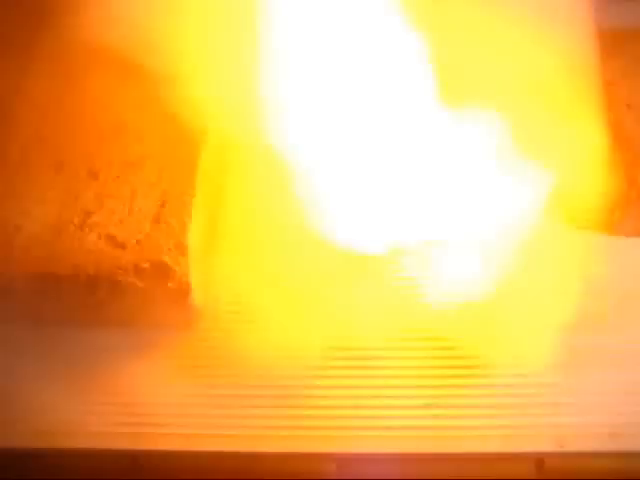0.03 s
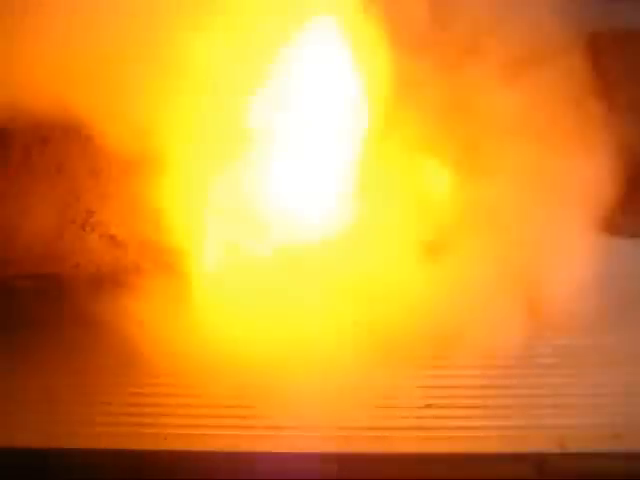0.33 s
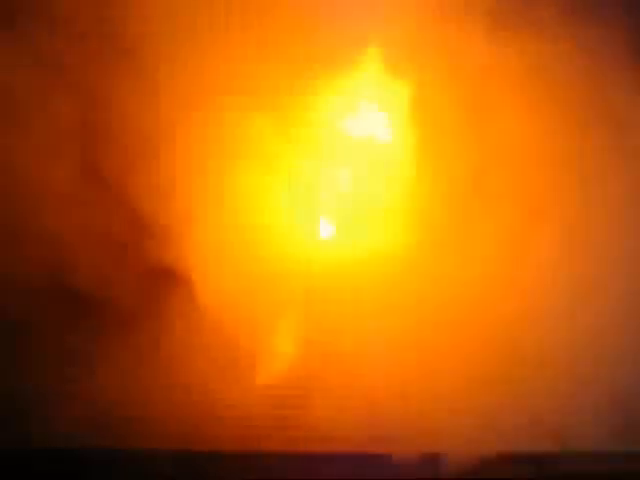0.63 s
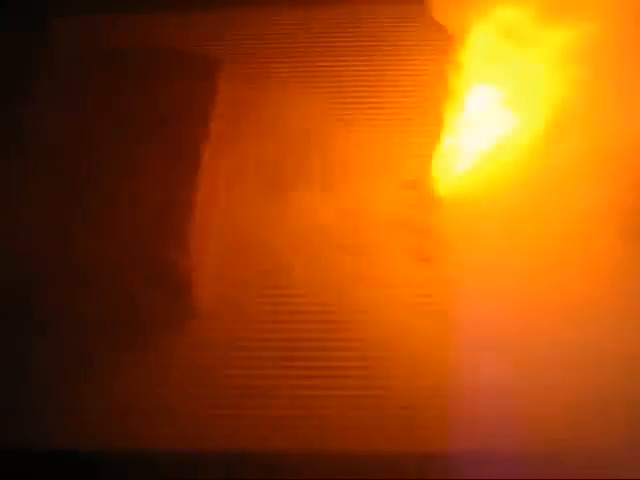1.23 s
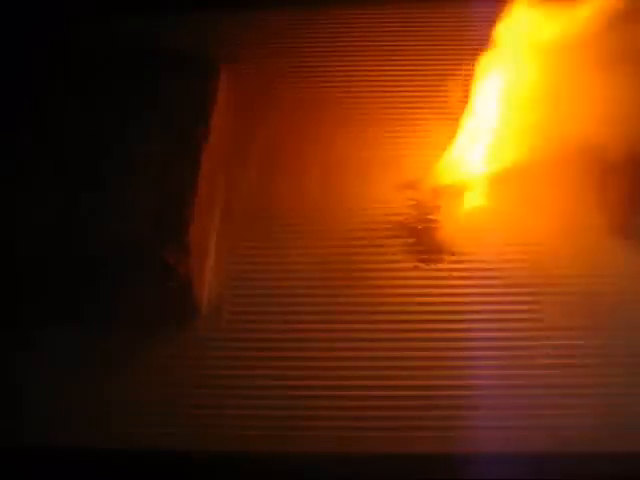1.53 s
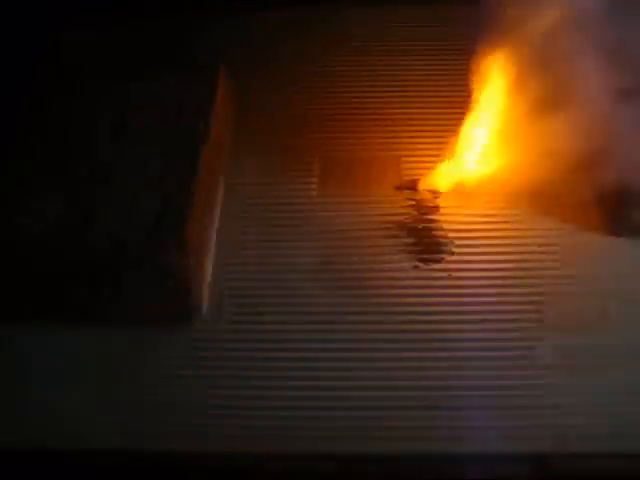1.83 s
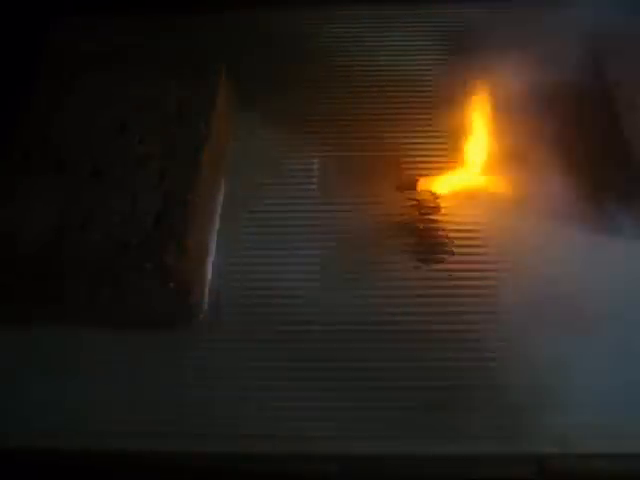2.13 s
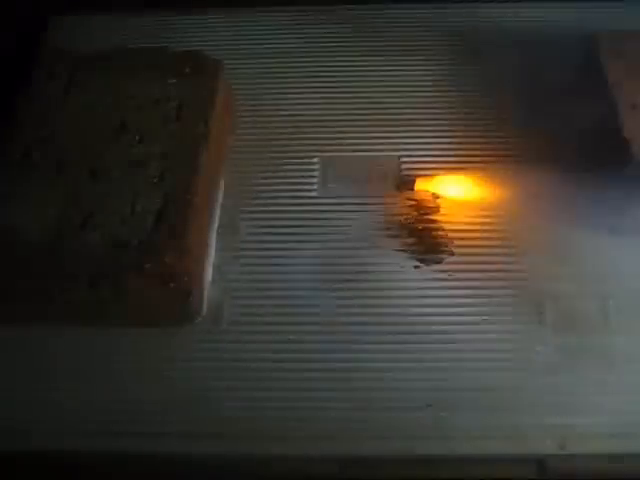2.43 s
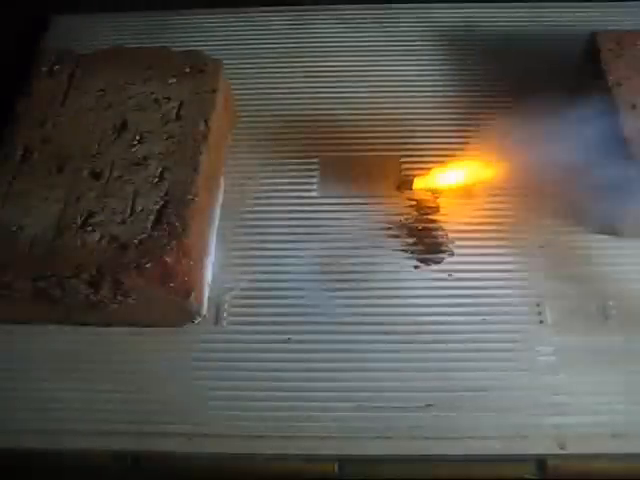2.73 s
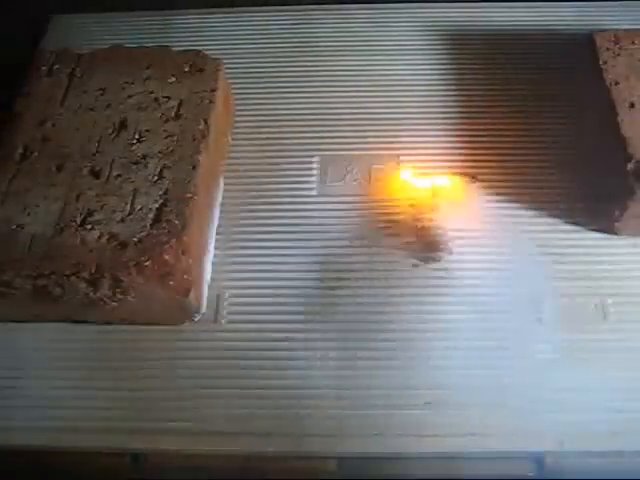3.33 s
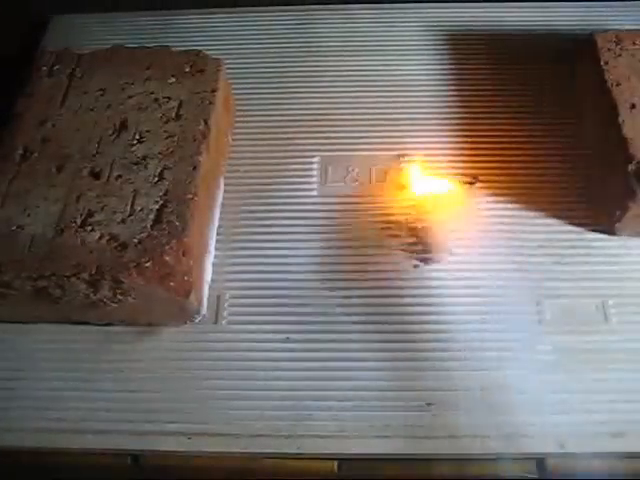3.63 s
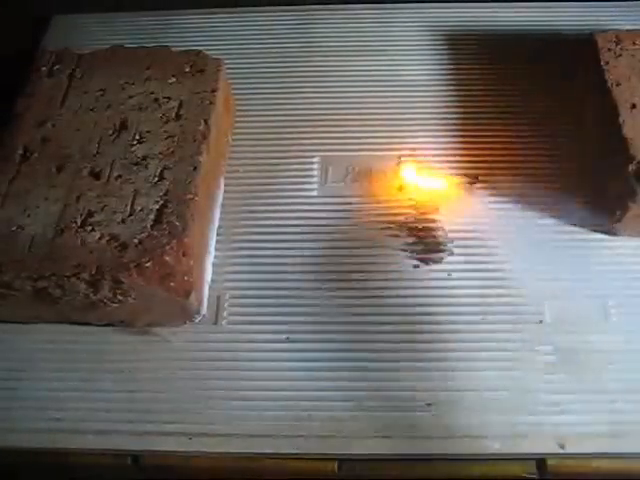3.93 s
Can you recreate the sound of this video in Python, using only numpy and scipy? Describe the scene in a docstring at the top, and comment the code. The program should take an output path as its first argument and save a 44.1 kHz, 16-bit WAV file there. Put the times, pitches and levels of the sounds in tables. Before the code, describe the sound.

Burning propellant hisses loudly and unevenly over a low roar and fine crackle. Two sharp pops break in, then the hiss steadies into a jet. Near the end, gusts rumble on the close outdoor microphone.

```python
"""An uneven, flaring hiss over a low roar: solid propellant burns outdoors on a ribbed plate, close
to a mono microphone. Turbulent gas makes the noise, and bursting grains add a fine crackle. Twice the
flow chokes and trapped gas escapes in a pop that overloads the recorder. The flare then narrows into
a steady hissing jet. Towards the end the plume turns and its gusts buffet the microphone."""
import sys
import numpy as np
from scipy import signal
from scipy.fft import rfft, irfft, next_fast_len
from scipy.io import wavfile
from scipy.ndimage import uniform_filter1d, map_coordinates

SR = 44100
rng = np.random.default_rng(int(sys.argv[2]) if len(sys.argv) > 2 else 0)


def store_pcm(level_fs):
    """Save levels as 16-bit WAV."""
    pcm = np.round(np.clip(level_fs, -1, 1) * 32767).astype(np.int16)
    wavfile.write(sys.argv[1], SR, np.atleast_2d(pcm).T)


N = 176400

# The burn surges, then settles (levels before trim): time_s, roar_db, hiss_db, fizz_db
BURN_LEVELS = [(0.0, -31.5, -22, -23), (0.285, -33, -21.5, -25), (0.32, -29.5, -21.5, -31.5),
               (0.41, -23, -22, -29), (0.435, -24.9, -18, -23.5), (0.45, -33, -23, -20),
               (0.495, -36, -20.8, -27.2), (0.545, -37.5, -22, -22), (0.635, -29, -21.2, -32.5),
               (0.715, -23.5, -18, -29), (0.79, -28.1, -21, -24.5), (0.815, -27, -17, -27),
               (0.84, -32, -20.0, -22.5), (0.915, -33.5, -21.5, -27), (0.94, -28, -18.5, -34),
               (0.99, -27, -19, -25), (1.005, -29, -16, -29), (1.035, -31, -18.5, -24),
               (1.075, -30, -19.5, -25.5), (1.125, -32.5, -23.5, -23.5), (1.185, -26, -18, -34),
               (1.22, -23.5, -19.5, -27.5), (1.25, -29, -15.5, -24.5), (1.295, -31.5, -20, -29.1),
               (1.335, -25.5, -18.5, -31.7), (1.405, -23, -15.5, -27), (1.46, -25, -19.5, -29.8),
               (1.525, -27.5, -18, -26.9), (1.75, -32.1, -19.5, -28), (2.05, -29.6, -18, -30.6),
               (2.24, -30.5, -17.5, -28.5), (2.255, -32, -18.5, -29.3), (2.555, -32.0, -19.4, -27),
               (3.175, -29, -18, -29), (3.235, -28.5, -19.0, -26), (3.295, -28, -17, -33),
               (3.415, -30, -18, -26), (3.59, -28.5, -18, -30.5), (3.985, -29, -18, -28.8)]
# Spectra of the open flare and the narrow jet: frequency_hz, relative_density_db
FLARE_SPECTRUM = [(25, -35), (100, -32), (180, -23.4), (300, -21), (550, -17.5), (800, -13), (1300, -10.5),
                  (1800, -5.5), (2700, -1), (4000, 2), (5100, 1.5), (6200, -0.5), (7800, -7), (9200, -10.5),
                  (11000, -9.5), (13500, -15), (14500, -19), (15300, -33)]
JET_SPECTRUM = [(25, -36), (100, -40), (180, -27), (300, -25.5), (550, -19), (900, -14), (1400, -10),
                (2100, -8.5), (2700, -4), (3500, -2), (4100, -0.5), (5500, -2.5), (7300, -3.5),
                (8900, -13.5), (11500, -11), (13300, -15.0), (14300, -22.5), (15300, -35)]
# A hollow drifting through the upper hiss: time_s, centre_hz, depth_db
HISS_NOTCH = [(.55, 6500, -0.5), (1.2, 6330, 9), (1.45, 5700, 5), (1.62, 5700, 0), (1.9, 6700, -0.5),
              (2.4, 7200, 3), (3.5, 6500, 5.5)]
# Bursts of trapped gas: start_s, level_db, hold_s, choke_depth_db, rolloff_hz
GAS_POPS = [(1.043, -2, 0.012, 2, 14200), (1.3797, 0, 0.0083, 6, 8700)]
# Spectrum of a pop: frequency_hz, relative_density_db
POP_SPECTRUM = [(30, -24), (100, -12), (250, -6), (450, -8.5), (700, -15.5), (1050, -7), (1500, -9),
                (2600, -0.5), (4500, 0), (7000, -3), (9000, -8), (13000, -7.5), (15500, -35)]
# Wind of the plume on the microphone (levels before trim): time_s, level_db
WIND_LEVELS = [(1.5, -56.5), (1.91, -65), (2.04, -56), (2.15, -57.7), (2.205, -50), (2.27, -65),
               (2.505, -47), (2.565, -60), (2.675, -46), (2.715, -59), (2.88, -37), (3.03, -47),
               (3.06, -36), (3.575, -46), (3.82, -36.5), (3.98, -42)]
# Spectrum of the wind: frequency_hz, relative_density_db
WIND_SPECTRUM = [(20, -8.5), (45, -1), (90, -0.5), (160, -3), (260, -6.5), (450, -17), (900, -27),
                 (2000, -70)]
# Single eddies striking the microphone: peak_s, level_db, gaussian_width_s
EDDY_THUMPS = [(3.077, -32, .004), (3.192, -28, 0.0075), (3.37, -35, .005), (3.841, -32.5, 0.0046),
               (3.996, -28, 0.0059)]
# Spectrum of a thump: frequency_hz, relative_density_db
EDDY_SPECTRUM = [(20, -12), (100, -9), (350, 3), (600, -3), (1200, -25), (4000, -70)]

SETTLE_MIDPOINT_S, SETTLE_LENGTH_S = 1.5, 0.37  # the flare narrows into the jet
ROAR_EDGE_HZ, FIZZ_EDGE_HZ, NOTCH_WIDTH_HZ = 2500, 8500, 460
ROAR_TRIM_DB, HISS_TRIM_DB, FIZZ_TRIM_DB = 0.46, -0.3, 0.76
FLUTTER_PER_S, FLUTTER_DB = 45, 0.34  # unsteadiness of the whole flame
CRACKLES_PER_S, CRACKLE_SPREAD_DB, CRACKLE_RE_HISS_DB = 300, 2.5, -13
CHOKE_S, POP_T60_S, POP_LOW_HZ = 0.04, 0.025, 100
POP_TAIL_DB, POP_TAIL_T60_S = -29, 0.13
WIND_TRIM_DB, WIND_RISE_DB_PER_S, GUSTS_PER_S, GUST_DB = 1.1, 16, 28, 2.5
CLIP_LEVEL, CLIP_HARDNESS, BAND_LIMIT_HZ = 0.95, 6.7, 15400
TIME_S = np.arange(N) / SR


def amp(db):
    """Amplitude grows tenfold for every 20 decibels."""
    return 10 ** (np.asarray(db) / 20)


def unit_rms(x):
    """Normalisation to unit mean power."""
    return x / np.sqrt(np.mean(x ** 2) + 1e-20)


def curves(rows):
    """Linear interpolation in time of each column after the first."""
    times, *columns = np.transpose(rows)
    return [np.interp(TIME_S, times, column) for column in columns]


def wobble(knots_per_s):
    """Spline interpolation of random values gives a smooth fluctuation."""
    return map_coordinates(rng.standard_normal(2048), [TIME_S * knots_per_s], mode="mirror")


def filtered(x, response):
    """Linear filtering multiplies the spectrum by a frequency response."""
    size = next_fast_len(N + 8192)
    return irfft(rfft(x, size) * response(np.fft.rfftfreq(size, 1 / SR)), size)[..., :N]


def coloured(x, spectrum):
    """Spectral shaping, interpolated in log frequency, at rms 1."""
    knots_hz, db = np.transpose(spectrum)
    return unit_rms(filtered(x, lambda hz: amp(np.interp(np.log(hz + 1), np.log(knots_hz + 1), db))))


def band(x, low_hz, high_hz, order):
    """Band-pass filtering with Butterworth slopes, at rms 1."""
    def response(hz):
        low_cut = 1 + (low_hz / (hz + 1)) ** (2 * order)
        high_cut = 1 + (hz / high_hz) ** (2 * order)
        return (low_cut * high_cut) ** -.5
    return unit_rms(filtered(x, response))


def turbulence(patchy_db):
    """Turbulence is intermittent: its noise swells and fades in patches of time and frequency."""
    spectra = signal.stft(rng.standard_normal(N), nperseg=256)[2]
    patches = uniform_filter1d(rng.standard_normal(spectra.shape), size=4, axis=0)
    patches = uniform_filter1d(patches, size=18, axis=1)
    return signal.istft(spectra * amp(patchy_db * unit_rms(patches)), nperseg=256)[1][:N]


def rushing_gas(low_hz, high_hz, patchy_db):
    """Turbulent flow radiates noise; the spectrum of this band shifts as the flare narrows to a jet."""
    jet_share = np.clip((TIME_S - SETTLE_MIDPOINT_S) / SETTLE_LENGTH_S + .5, 0, 1)
    noise = turbulence(patchy_db)
    flare = band(coloured(noise, FLARE_SPECTRUM), low_hz, high_hz, order=5)
    jet = band(coloured(noise, JET_SPECTRUM), low_hz, high_hz, order=5)
    return (1 - jet_share) * flare + jet_share * jet


def grain_crackle():
    """Grains burst independently, so their clicks form a Poisson process; rms 1."""
    bursts = rng.random(N) < CRACKLES_PER_S / SR
    sizes = amp(CRACKLE_SPREAD_DB * np.minimum(rng.exponential(size=N), 4))
    return coloured(bursts * sizes * rng.choice([-1, 1], N), JET_SPECTRUM)


def drifting_notch(x):
    """A moving spectral notch is heard as a hollow in the hiss; rms 1."""
    hz, frame_s, spectra = signal.stft(x, SR, nperseg=512)
    times, centres_hz, depths_db = np.transpose(HISS_NOTCH)
    offset_hz = hz[:, None] - np.interp(frame_s, times, centres_hz)
    cut_db = np.interp(frame_s, times, depths_db) * np.exp(-.5 * (offset_hz / NOTCH_WIDTH_HZ) ** 2)
    return unit_rms(signal.istft(spectra * amp(-cut_db), SR, nperseg=512)[1][:N])


def flame():
    """Combustion noise follows the gas flow: roar, hiss and fizz surge, and dip when it chokes."""
    roar_db, hiss_db, fizz_db = curves(BURN_LEVELS)
    roar = amp(roar_db + ROAR_TRIM_DB) * rushing_gas(10, ROAR_EDGE_HZ, patchy_db=1.0)
    hiss = rushing_gas(ROAR_EDGE_HZ, FIZZ_EDGE_HZ, patchy_db=1.07)
    hiss += amp(CRACKLE_RE_HISS_DB) * grain_crackle()
    hiss = amp(hiss_db + HISS_TRIM_DB) * drifting_notch(hiss)
    fizz = amp(fizz_db + FIZZ_TRIM_DB) * rushing_gas(FIZZ_EDGE_HZ, SR, patchy_db=1.5)
    choke_db = sum(depth_db * ((TIME_S > pop_s - CHOKE_S) & (TIME_S < pop_s))
                   for pop_s, _, _, depth_db, _ in GAS_POPS)
    choke_db = uniform_filter1d(choke_db, size=128)
    return (roar + hiss + fizz) * amp(FLUTTER_DB * wobble(FLUTTER_PER_S) - choke_db)


def gas_pops():
    """Sudden release of trapped gas makes a broadband burst that holds, then decays exponentially."""
    pops = np.zeros(N)
    for start_s, level_db, hold_s, _, rolloff_hz in GAS_POPS:
        decay_s = np.maximum(TIME_S - start_s - hold_s, 0)
        body = amp(-60 * decay_s / POP_T60_S)
        tail = amp(POP_TAIL_DB - 60 * decay_s / POP_TAIL_T60_S)
        burst = band(coloured(rng.standard_normal(N), POP_SPECTRUM), POP_LOW_HZ, rolloff_hz, order=2)
        pops += amp(level_db) * (TIME_S >= start_s) * (body + tail) * burst
    return pops


def plume_wind():
    """Pressure fluctuations of the plume on the microphone are heard as a gusty rumble."""
    level_db, = curves(WIND_LEVELS)
    fade_in_db = -WIND_RISE_DB_PER_S * np.maximum(WIND_LEVELS[0][0] - TIME_S, 0)
    gusts = amp(GUST_DB * wobble(GUSTS_PER_S))
    rumble = unit_rms(gusts * coloured(rng.standard_normal(N), WIND_SPECTRUM))
    return amp(level_db + WIND_TRIM_DB + fade_in_db) * rumble


def eddy_thumps():
    """Each eddy striking the microphone makes a brief, low pressure disturbance."""
    envelope = sum(amp(level_db) * np.exp(-.5 * ((TIME_S - peak_s) / width_s) ** 2)
                   for peak_s, level_db, width_s in EDDY_THUMPS)
    return envelope * coloured(rng.standard_normal(N), EDDY_SPECTRUM)


def scene():
    """Superposition: the pressures add at one microphone, which feeds both channels."""
    return np.tile(flame() + gas_pops() + plume_wind() + eddy_thumps(), (2, 1))


def record(dry):
    """Saturation flattens the peaks of the pops; a band limit then removes the highest treble."""
    clipped = dry / (1 + np.abs(dry / CLIP_LEVEL) ** CLIP_HARDNESS) ** (1 / CLIP_HARDNESS)
    return filtered(clipped, lambda hz: hz < BAND_LIMIT_HZ)


dry = scene()
out = record(dry)
store_pcm(out)
```